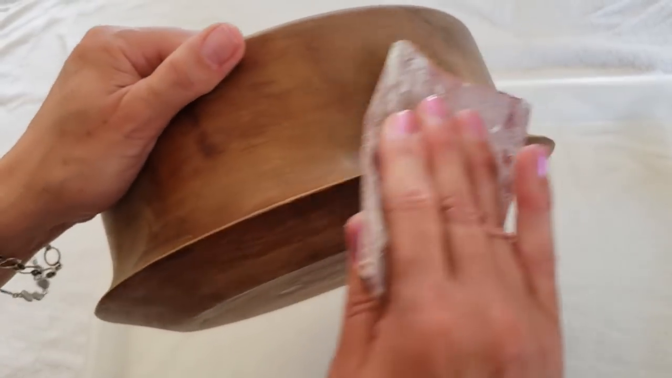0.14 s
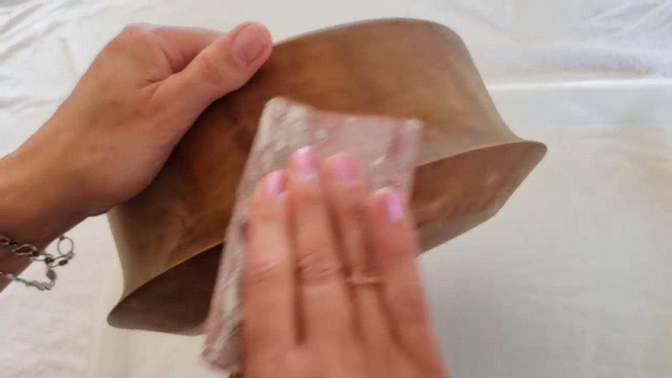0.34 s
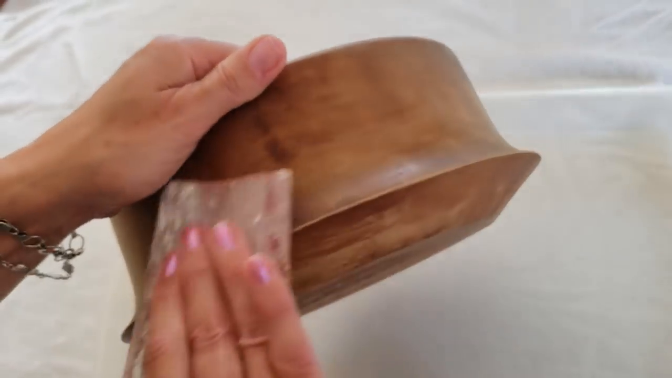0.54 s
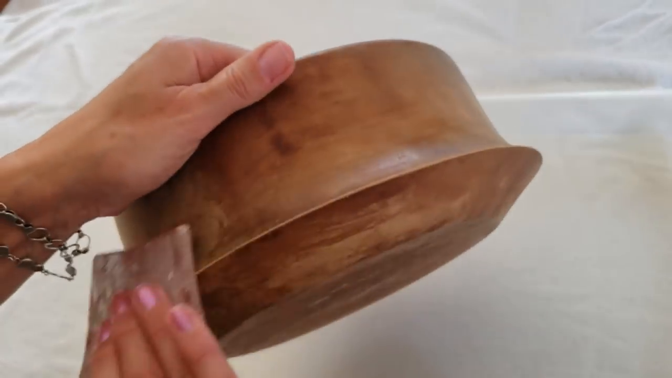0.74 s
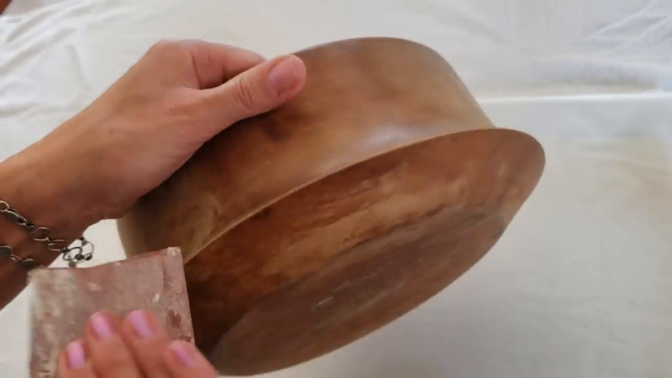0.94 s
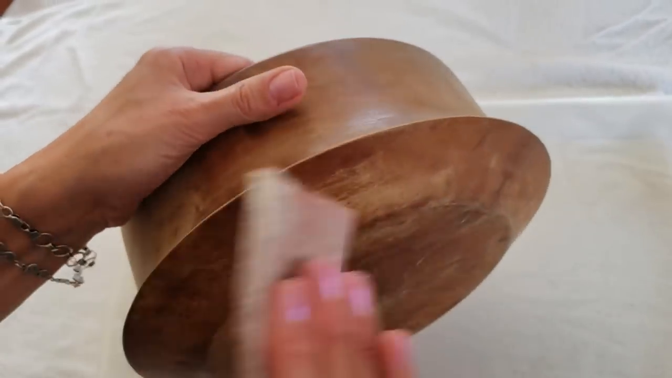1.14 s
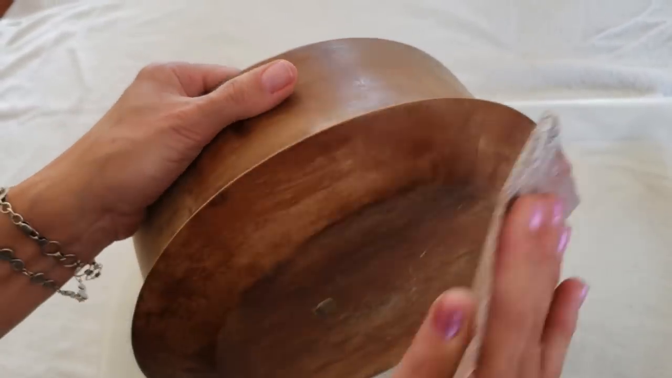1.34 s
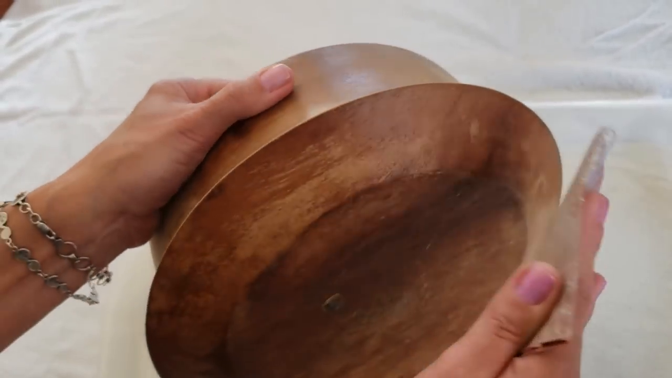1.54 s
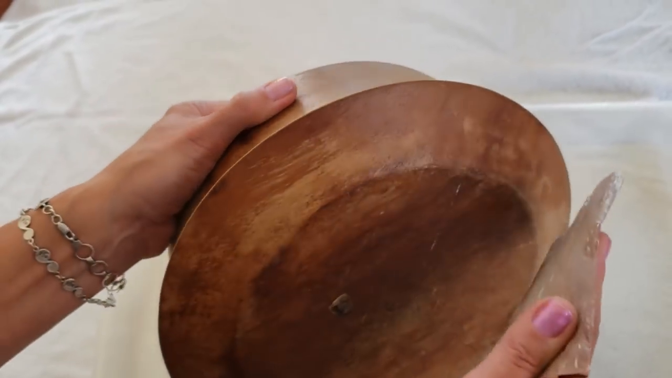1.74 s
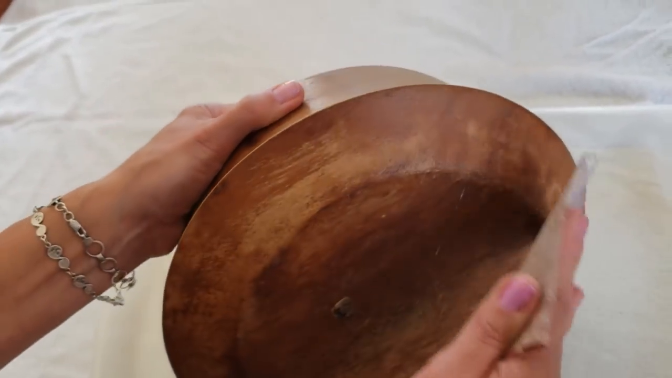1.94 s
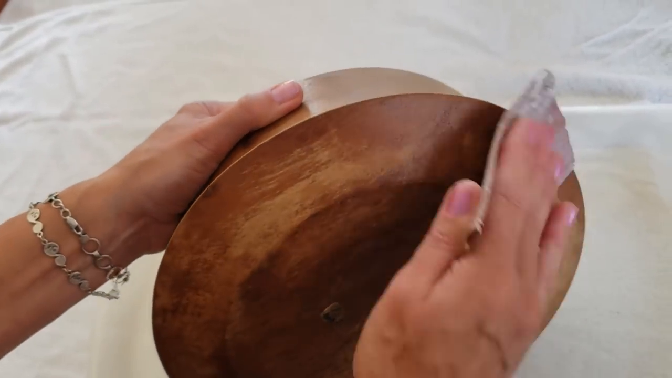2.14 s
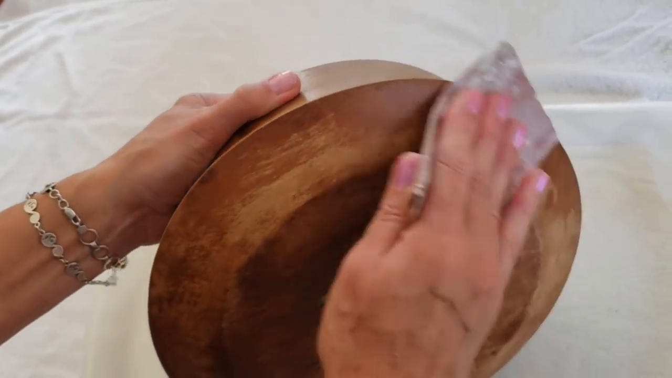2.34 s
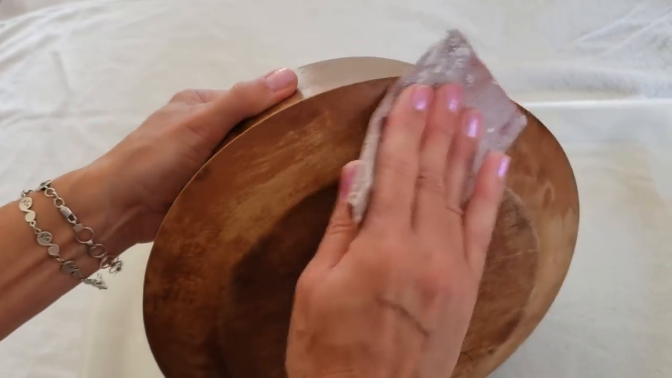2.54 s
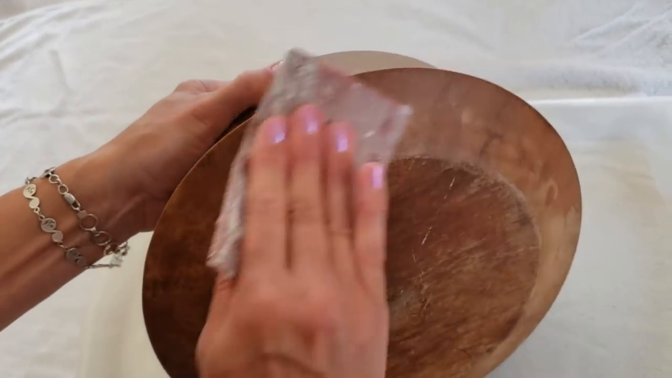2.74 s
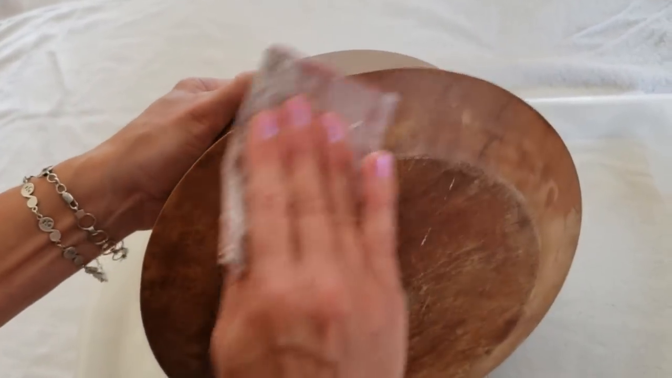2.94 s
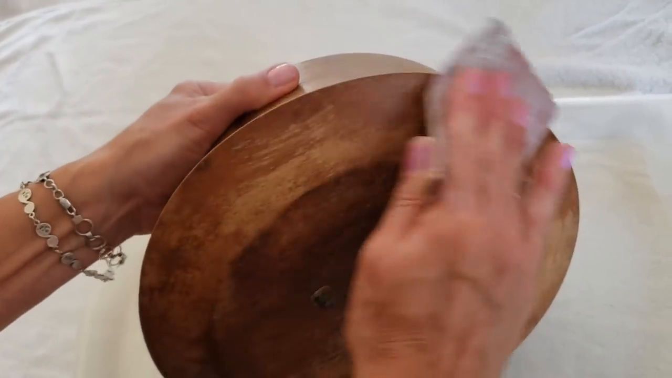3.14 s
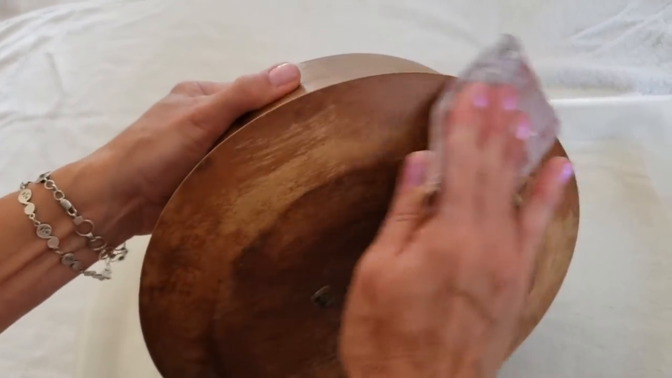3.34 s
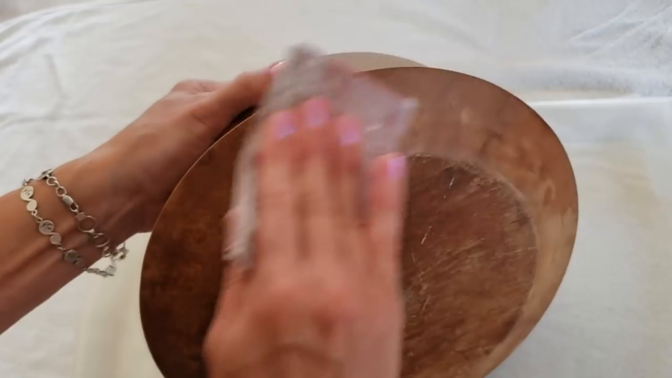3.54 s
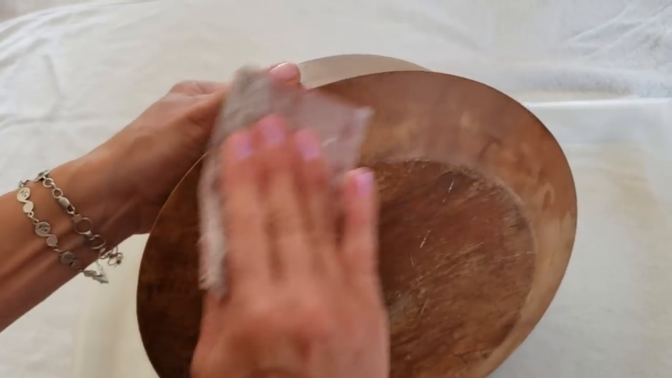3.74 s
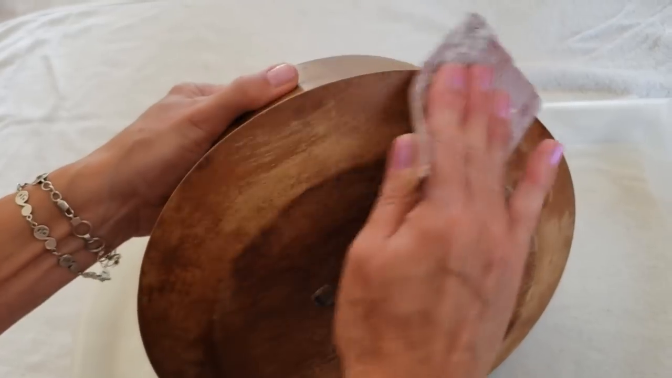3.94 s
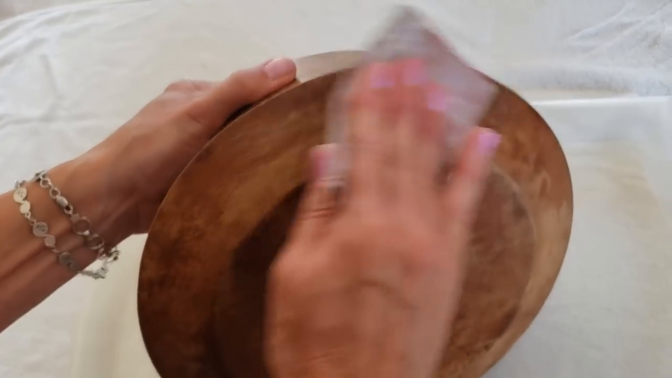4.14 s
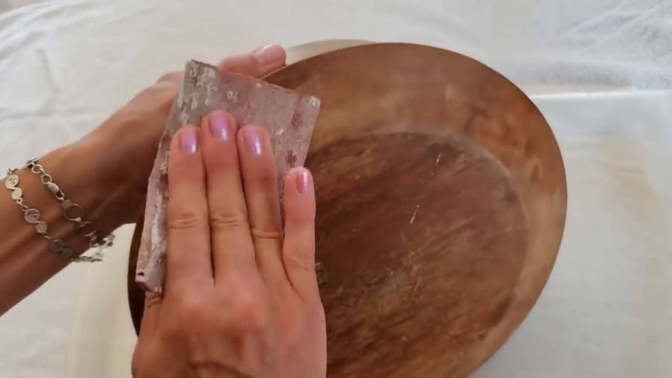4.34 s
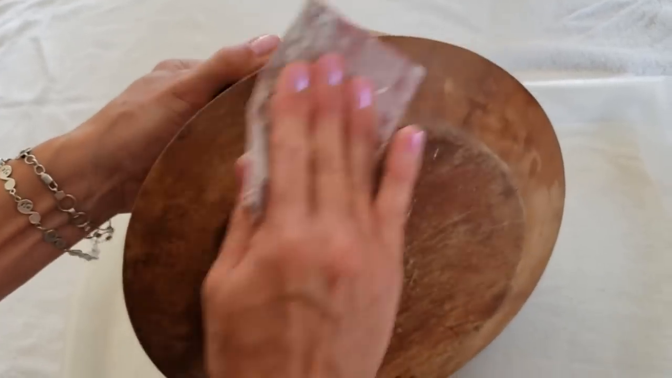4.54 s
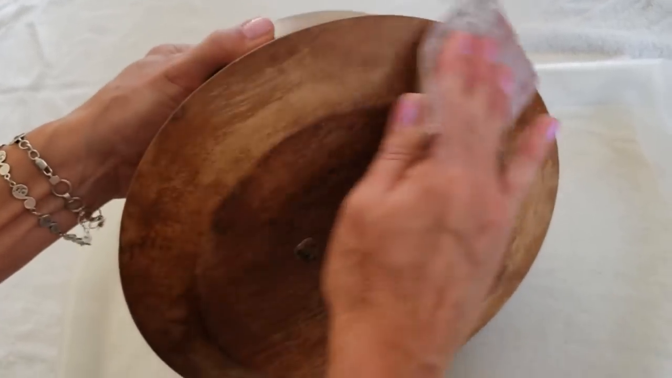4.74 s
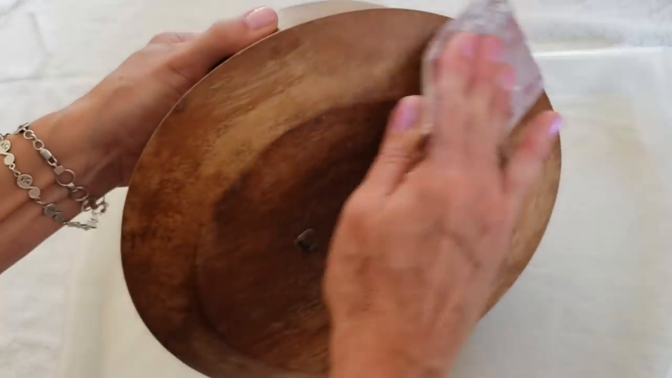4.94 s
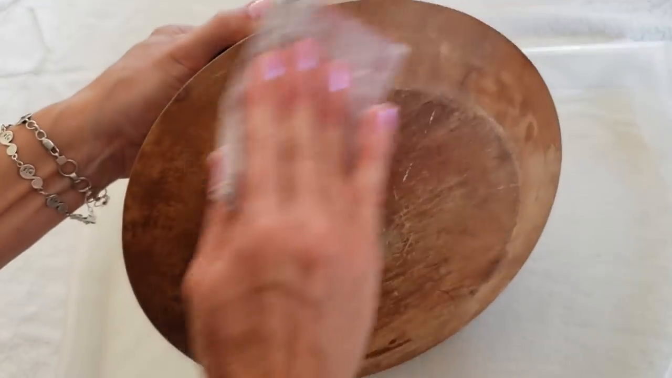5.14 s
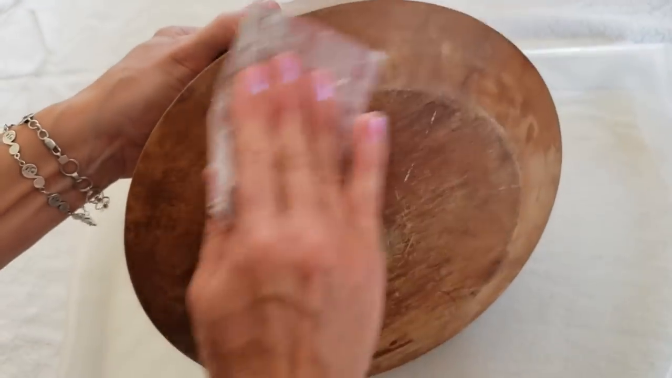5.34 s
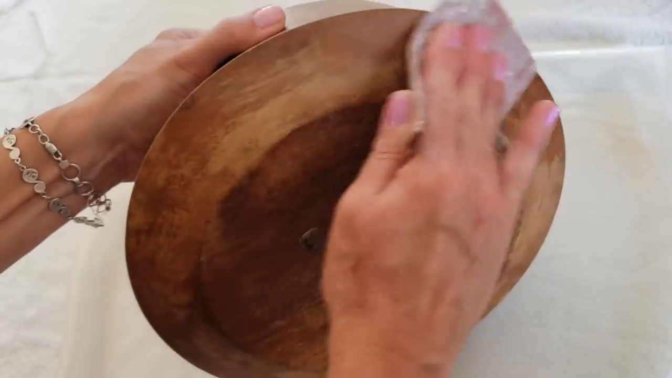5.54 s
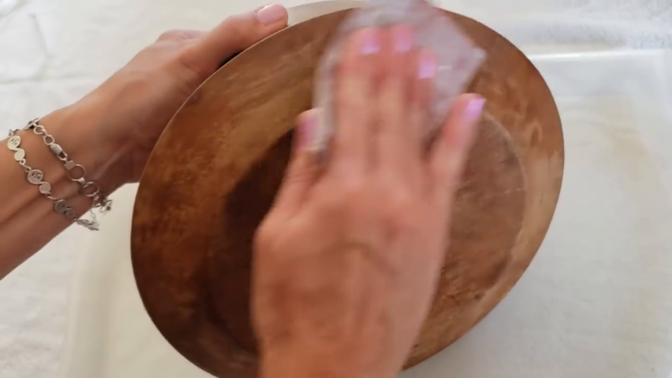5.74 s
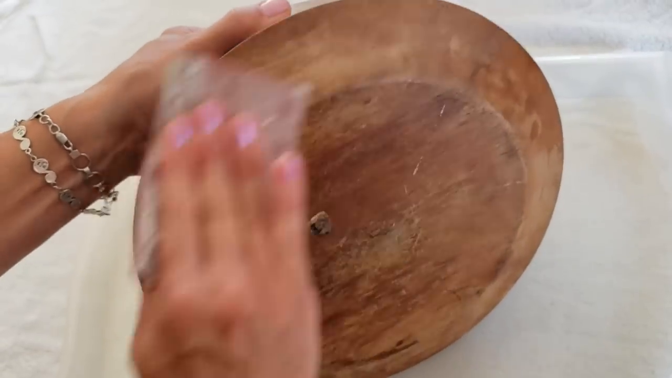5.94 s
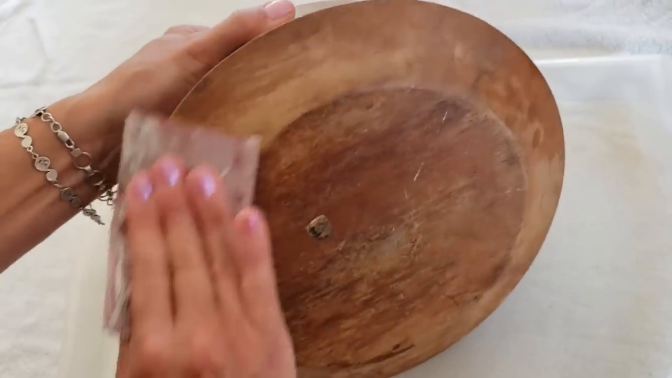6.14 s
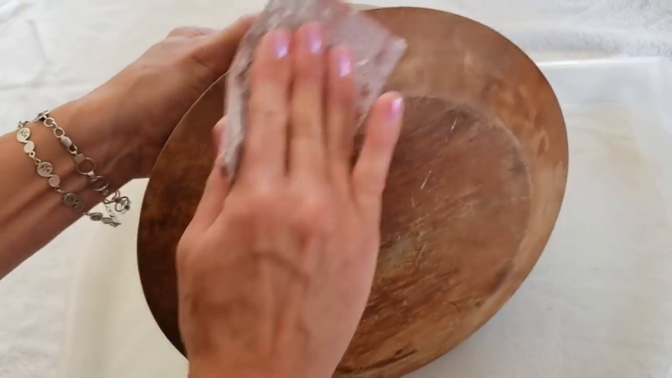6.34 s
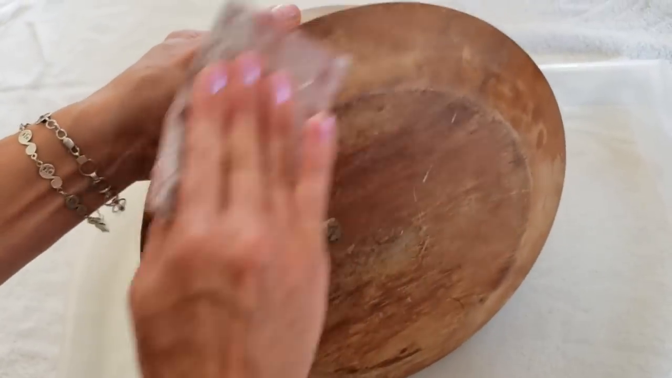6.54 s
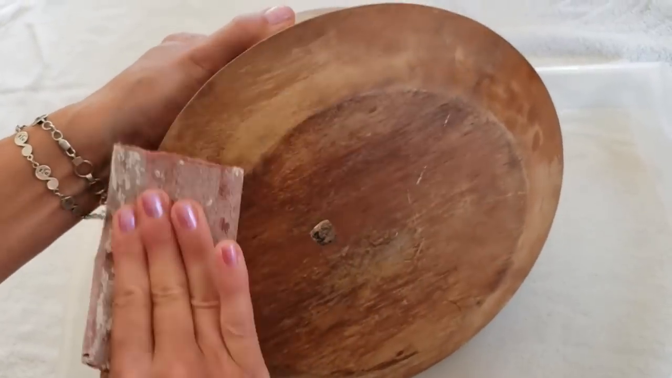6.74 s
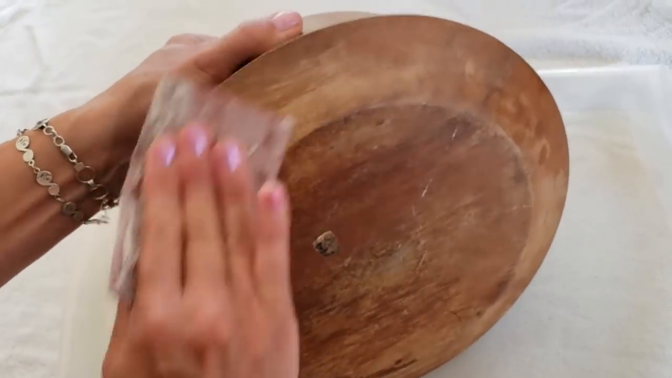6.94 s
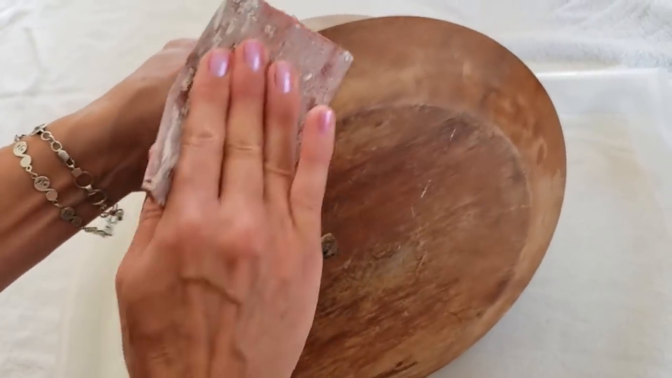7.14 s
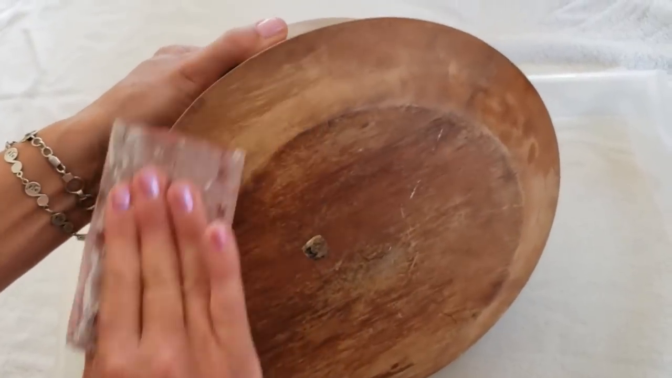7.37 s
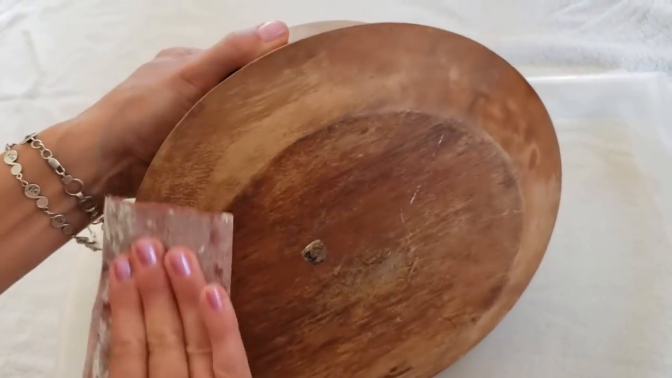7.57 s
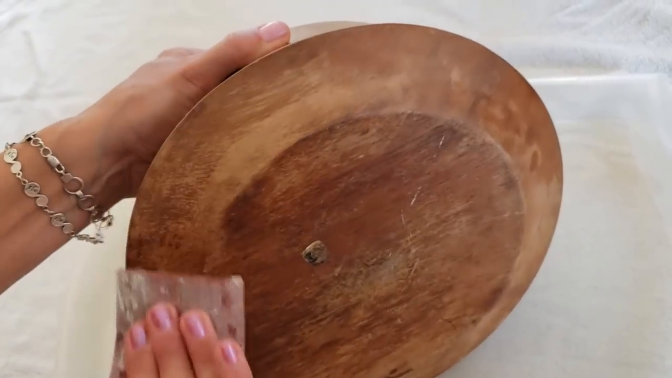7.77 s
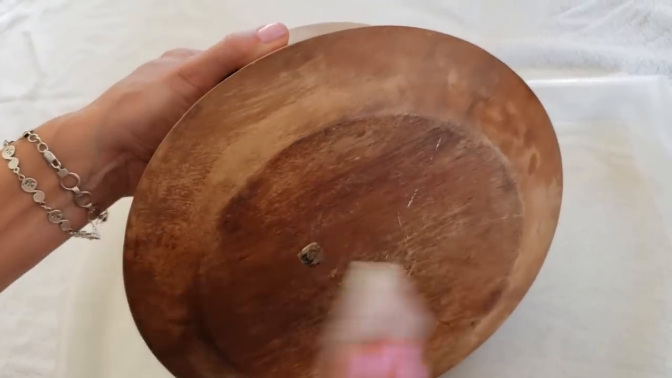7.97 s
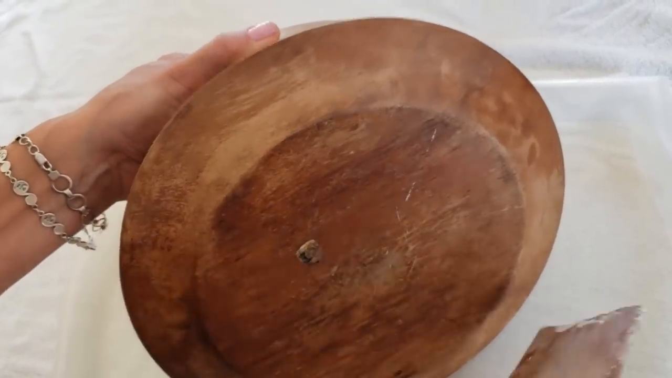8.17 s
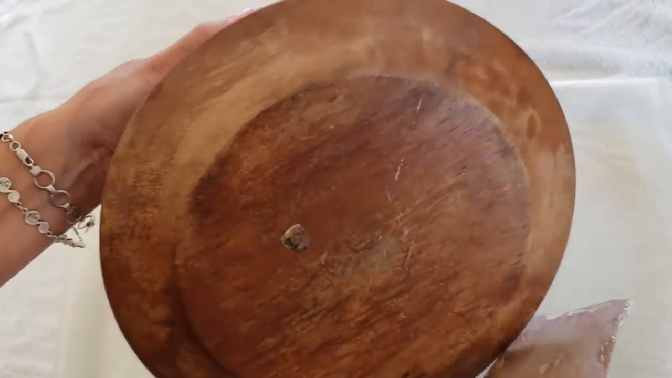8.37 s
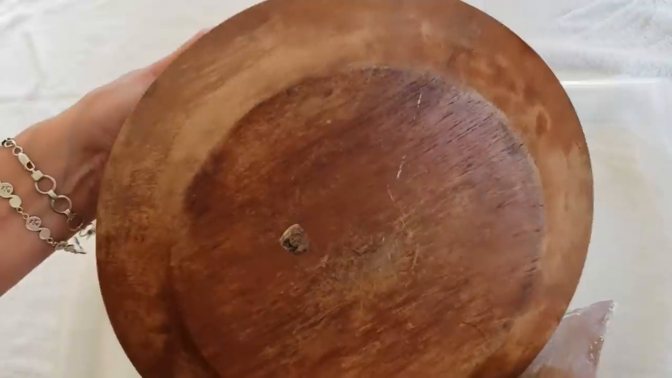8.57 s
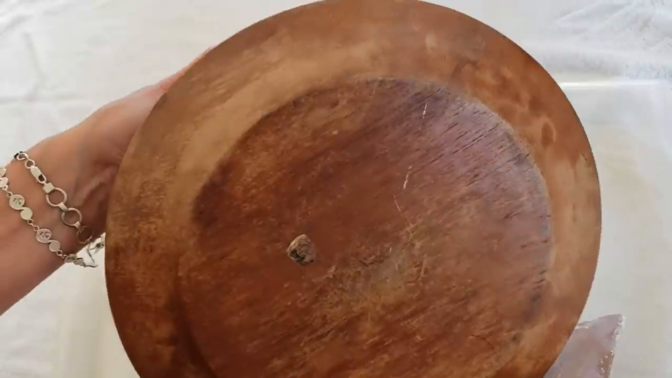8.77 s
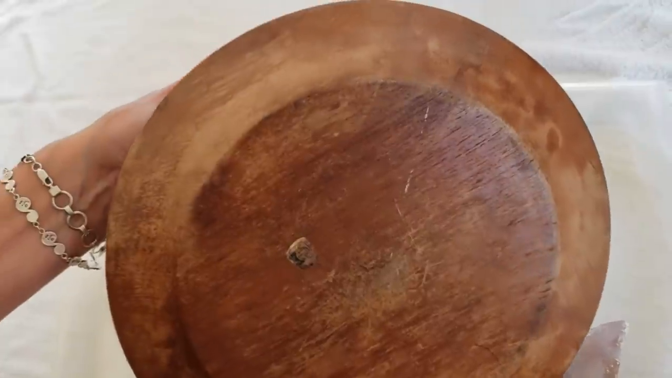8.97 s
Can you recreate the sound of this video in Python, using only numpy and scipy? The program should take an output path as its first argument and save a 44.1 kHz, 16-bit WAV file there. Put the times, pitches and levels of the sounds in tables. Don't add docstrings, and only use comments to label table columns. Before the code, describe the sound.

A quiet room with soft low hum, miked very close in stereo, left fuller, right brighter. From 0 to 0.9 s sandpaper lightly brushes a wooden bowl, which rings faintly; a sharp tick snaps far left at 0.55. Around 1.0 to 1.1 come soft scuffs and hollow finger taps, then near silence with handling rumble. At 1.8 the bowl knocks the table firmly, with a softer bounce at 1.92. Faint touches ring at 2.1. From 2.3 to 7.2 quick sanding strokes alternate, each about 0.3 to 0.4 s with two pushes, starting fast and stopping abruptly: dense dry grit, bright around 5 kHz, slightly woody. A crack lands at 5.68. A longer weaker stroke runs 7.2 to 7.9 and fades. After a pause, a tick and gentle ringing brush come at 8.4 to 8.65, then small ticks dwindle until 9 s.

```python
import sys
import numpy as np
from scipy import signal
from scipy.fft import rfft, irfft, next_fast_len
from scipy.io import wavfile
from scipy.ndimage import uniform_filter1d, map_coordinates

SR = 44100
rng = np.random.default_rng(int(sys.argv[2]) if len(sys.argv) > 2 else 0)


def elevation(decibels):
    levels = np.asarray(decibels, float)
    return 10 ** (levels / 20)


def transcribe(signal):
    frames = np.atleast_2d(signal).T
    limited = np.clip(frames, -1, 1)
    pcm = np.round(limited * 32767).astype(np.int16)
    wavfile.write(sys.argv[1], SR, pcm)


N = 397341
SIZE = next_fast_len(N + 16384)
HZ = np.maximum(np.arange(SIZE // 2 + 1) * SR / SIZE, 1)


def at_hz(points):
    hz, value = np.array(points).T
    return np.interp(np.log(HZ), np.log(hz), value)


def rms_one(x):
    return x / np.sqrt(np.mean(x ** 2) + 1e-20)


def drift(rate):
    r = np.exp(-80 * np.pi * rate / SR)
    noise = rng.standard_normal(N // 40 + 2002)
    slow = signal.lfilter([1], [1, -2 * r, r * r], noise)[2000:]
    return np.interp(np.arange(N) / 40, np.arange(len(slow)), rms_one(slow))


def causal(db):
    cepstrum = irfft(db * np.log(10) / 20, SIZE)
    cepstrum[1:SIZE // 2] *= 2
    cepstrum[SIZE // 2 + 1:] = 0
    return np.exp(rfft(cepstrum))


def bell(hz, width):
    return 1 / (1 + (2 * (HZ - hz) / width) ** 2)


# (f/Hz, left minus right level/dB)
PORTS = [(60, 7), (110, 10), (200, 11.5), (380, 14.5), (700, 3.5), (1290, 4.5), (2380, 9.5), (4400, 1.5),
         (8120, 1.5), (15000, -7)]
# (f/Hz, left-right correlation)
LIKENESS = [(60, .8), (400, 0.69), (1400, 0.47), (3000, .1), (15000, 0.0297)]


def ports(shared, own):
    alike = np.clip(at_hz(LIKENESS), 0, .99)
    tilt = elevation(at_hz(PORTS) / 2)
    mid = np.sqrt(1 + alike) * shared
    side = np.sqrt(1 - alike) * own
    return np.array([(mid + side) * tilt, (mid - side) / tilt])


def heard(pair, response):
    x = irfft(pair * response, SIZE)[:, :N]
    return x / np.sqrt(np.mean(x.mean(axis=0) ** 2) + 1e-20)


def port_noise():
    return ports(*rfft(rng.standard_normal((2, SIZE))))


# (f/Hz, level/dB per Hz)
HUM = [(15, -40), (25, -18), (45, -3.5), (86, -9), (113, -7), (179, -18.5), (216, -11.5), (255, -14.5),
       (352, -15.5), (620, -21.5), (1640, -33.5), (2200, -32.5), (8490, -43.5), (12700, -35.5),
       (15800, -37)]
# (f/Hz, width/Hz, level/dB)
HUM_TONES = [(206, 43, -78), (351.5, 27, -79.5), (450, 29, -91), (1614, 300, -82.5), (3730, 710, -87.5),
             (6000, 2900, -93.5)]
# (t/s, half width/s, rumble swell level/dB)
HANDLING = [
    (.7, 0.27, 5.5),
    (1.3, 0.063, 5.5),
    (1.98, .2, 6),
    (2.9, 0.67, -2),
    (4.2, 0.12, 2),
    (4.67, 0.11, -1),
    (7.7, 0.24, 6),
    (8.61, 0.11, 2),
]
HUM_DB, RUMBLE_DB, MURMUR_DB = -70, -75, -79.5
MURMUR_RUBBED_DB, RUBBED_FROM_DB = -71, -70


def hum(body):
    colour, t = elevation(at_hz(HUM)), np.arange(N) / SR
    out = elevation(HUM_DB - 11.5 + drift(3)) * heard(port_noise(), colour * (HZ > 750))
    pair = port_noise()
    for hz, width, db in HUM_TONES:
        out += elevation(db + 1.6 * drift(3)) * heard(pair, bell(hz, width))
    swell_db = sum(db * np.exp(-((t - s) / width) ** 2) for s, width, db in HANDLING)
    out += heard(pair, colour * (HZ <= 150)) * elevation(RUMBLE_DB + swell_db + 2.8 * drift(4.5))
    rubbed = uniform_filter1d(body / (body + elevation(RUBBED_FROM_DB)), size=9000)
    murmur = heard(port_noise(), colour * (HZ > 150) * (HZ <= 750))
    murmur_gain = elevation(MURMUR_DB + 0.87 * swell_db) + rubbed * elevation(MURMUR_RUBBED_DB)
    return out + murmur * murmur_gain * elevation(2.3 * drift(4.8))


ROOM_T60_S, ROOM_DB = .31, -10


def room(x):
    t = np.arange(14000) / SR
    tail = rng.standard_normal((2, len(t))) * elevation(-60 * t / ROOM_T60_S) * (t > .006)
    tail /= np.sqrt(np.sum(tail ** 2, axis=1, keepdims=True))
    dull = 1 / np.sqrt(1 + (HZ / 5000) ** 2)
    return elevation(ROOM_DB) * irfft(rfft(x, SIZE) * rfft(tail, SIZE) * dull, SIZE)[:, :N]


# (t/s, peak level/dB)
KNOCKS = [
    (1.005, -56),
    (1.803, -36.5),
    (1.924, -45.5),
]
# (f/Hz, level/dB, t60/s)
TABLE = [(91.6, 2.5, 2.7), (212, 1.5, 0.32), (273, -22, 0.56), (360, -8, 0.57), (605, -12, 0.49),
         (625, 4.5, 0.14), (810, -17, 0.36), (1060, -24, 0.47), (1223, -17, 0.21), (1486, -22, 5.0),
         (2083, -16, 0.27), (2360, -9, 0.19)]
# (f/Hz, level/dB, t60/s)
KNOCK_TAIL = [(81, 5, 0.4), (308, 1.5, 0.33), (680, 5.5, 0.22), (1430, 1, 0.1), (2420, -28, .07),
              (5000, -17, 0.27)]
KNOCK_CRACK_DB, KNOCK_CRACK_S = 3, .00018


def knocks():
    out, t = np.zeros((2, N)), np.arange(SR // 2) / SR
    lean_left = elevation([[3], [-3]])
    for s, db in KNOCKS:
        hit = np.zeros((2, len(t)))
        for hz, mode_db, t60 in TABLE:
            decay = elevation(mode_db - 18 + rng.normal(0, 0.67) - 60 * t / min(t60, .3))
            hit += decay * np.sin(2 * np.pi * hz * t) * lean_left
        for hz, tail_db, t60 in KNOCK_TAIL:
            sos = signal.butter(2, [hz / 1.6, hz * 1.6], "band", fs=SR, output="sos")
            noise = rms_one(signal.sosfilt(sos, rng.standard_normal((2, len(t)))))
            hit += elevation(tail_db - 19.0 - 60 * t / t60) * noise * lean_left
        crack = np.exp(-((t - .0012) / KNOCK_CRACK_S) ** 2)
        hit -= elevation(KNOCK_CRACK_DB) * crack * elevation([[-3], [-9]])
        i = round(s * SR)
        out[:, i:i + len(t)] += elevation(db) * hit * np.minimum(t / 0.00045, 1)
    return out


# (t/s, peak level/dB)
TAPS = [
    (.982, -52),
    (1.011, -48),
    (1.104, -56),
]
HOLLOW_HZ, HOLLOW_T60_S = 380, 0.07


def taps():
    out, t = np.zeros(N), np.arange(6000) / SR
    ring = np.sin(2 * np.pi * HOLLOW_HZ * t) * np.minimum(t / 0.0022, 1)
    for s, db in TAPS:
        i = round(s * SR)
        out[i:i + len(t)] += elevation(db - 60 * t / HOLLOW_T60_S) * ring
    return out * elevation([[4], [-8]])


# (t/s, peak level/dB, left minus right level/dB)
TICKS = [
    (0.5453, -27.5, 21.5),
    (2.2243, -49, 5),
    (5.6805, -31, 4.0),
    (8.4028, -45, 7.5),
    (8.6502, -47, 10),
    (8.7093, -49, 13),
    (8.763, -56, 12),
    (8.8544, -60, 16),
    (8.9644, -63, 11),
]
# (f/Hz, level/dB)
SNAP = [(500, -25), (1200, -6), (2500, 0), (5000, -3), (9000, -14), (15000, -20)]


def ticks():
    out, colour = np.zeros((2, N)), irfft(causal(at_hz(SNAP)), SIZE)[:300]
    for s, db, pan_db in TICKS:
        i = round(s * SR)
        burst = rng.standard_normal(40) * np.exp(-np.arange(40) / 6)
        crack = np.convolve(burst, colour)[:300]
        crack /= np.abs(crack).max()
        out[:, i:i + 300] += elevation(db + 1) * crack * elevation([[pan_db / 2], [-pan_db / 2]])
    return out


# (t/s, peak level/dB, length/s, bowl share level/dB)
SCUFFS = [
    (0.9675, -47.5, 0.0045, 5),
    (1.003, -35, 0.0052, 5),
    (1.091, -44.5, 0.011, -2),
    (7.925, -47.5, 0.0052, -4),
    (8.4, -47.5, 0.0079, 6),
    (8.649, -43.5, 0.0032, -1),
    (8.704, -48.5, 0.0076, -7),
]


def scuffs(layers):
    high, low = np.zeros(N), np.zeros(N)
    for s, db, length, bowl_db in SCUFFS:
        u = np.arange(1500) / SR / np.clip(length, .001, .011)
        shape = elevation(db - 16.5) * (u * np.exp(1 - u)) ** 2
        i = round(s * SR)
        high[i:i + 1500] += shape
        low[i:i + 1500] += shape * elevation(bowl_db)
    body, wall, grit, dust = layers
    return low * (0.81 * body + wall) + high * (grit + 0.4 * dust)


# (t/s, ring level/dB)
LIGHT = [
    [(0.0, -66), (0.132, -34), (0.198, -56), (0.282, -40), (0.39, -54), (0.444, -40.5), (0.6, -49),
     (0.76, -44), (0.97, -61)],
    [(1.97, -85), (2.02, -60), (2.088, -58.5), (2.104, -53.5), (2.16, -59.5), (2.2, -77)],
    [(8.425, -62), (8.437, -49.5), (8.47, -53), (8.5, -51.5), (8.55, -56), (8.609, -58.5), (8.623, -73),
     (8.645, -67)],
]
# (f/Hz, width/Hz, level/dB)
LAST_RINGS = [(1175, 60, 0), (1625, 45, 1), (2700, 250, -13), (3100, 200, -11), (4100, 300, -14),
              (5400, 600, -15)]
# (f/Hz, width/Hz, level/dB)
LIGHT_RINGS = [
    [(1150, 41, -7.5), (1824, 200, 2), (2600, 100, -4.5), (5810, 90, -12)],
    [(1258, 50, -6), (2240, 120, -0.5), (3360, 43, 3), (3980, 61, -3.5), (5380, 390, -2), (6600, 38, -18)],
    LAST_RINGS,
]
# plain grit between the rings, dust hiss re ring, trim (each level/dB)
LIGHT_BETWEEN_DB = (-20, -12.5, -4)
LIGHT_DUST_DB = (-4.5, -14, -9)
LIGHT_TRIM_DB = (-13, -2, -2)
LIGHT_SPREAD = (1.3, 2.4, 1.2)


def light_strokes(layers):
    t, out, pair = np.arange(N) / SR, 0, grit_clicks()
    body, wall, grit, dust = layers
    passages = zip(LIGHT, LIGHT_DUST_DB, LIGHT_RINGS, LIGHT_BETWEEN_DB, LIGHT_TRIM_DB, LIGHT_SPREAD)
    for rows, dust_db, rings, between_db, trim_db, spread in passages:
        s, db = np.transpose(rows)
        ring = sum(elevation(top_db) * bell(hz, spread * width) for hz, width, top_db in rings)
        plain = elevation(between_db) * (0.96 * body + wall + grit)
        ring_gain = elevation(np.interp(t, s, db + trim_db, left=-130, right=-130))
        dust_gain = elevation(np.interp(t, s, db + dust_db + trim_db, left=-130, right=-130))
        out = out + ring_gain * elevation(1.5 * drift(40)) * (heard(pair, ring) + plain)
        out = out + dust_gain * dust
    return out


CLICKS_PER_S, SIZE_SPREAD_DB, CLUMP_DB = 9000, 0.5, 1.6


def grit_clicks():
    sizes = elevation(SIZE_SPREAD_DB * np.minimum(rng.exponential(1, (2, N)), 4))
    sizes = sizes * rng.choice([-1, 1], (2, N))
    bites = rng.random((2, N)) < CLICKS_PER_S * elevation(CLUMP_DB * drift(60)) / SR
    return ports(*rfft(sizes * bites, SIZE))


# (f/Hz, level/dB per Hz)
GRIT = [(260, -39.5), (450, -23.5), (606, -23.5), (804, -12), (893, -11), (1170, -11), (1800, -15),
        (2460, -10.5), (3730, -10.5), (5330, 2.5), (6560, -12.5), (10100, -18.5), (13000, -16),
        (14400, -14.5), (15800, -26)]
# (f/Hz, width/Hz, lift level/dB)
BOWL = [(886, 200, -3), (1157, 60, 7.5), (1625, 37, 3.5), (1850, 120, -2), (2110, 51, 4), (2490, 170, 3),
        (3350, 61, 1), (5267, 1200, -8), (6560, 500, -1), (10270, 430, -5),
        (13050, 900, -8.5)]
LAYER_EDGES_HZ = (1900, 3500, 7000)


def grit_layers():
    pair = grit_clicks()
    lift_db = sum(db * bell(hz, width) for hz, width, db in BOWL)
    colour = causal(at_hz(GRIT) + lift_db)
    above = [1] + [1 / np.sqrt(1 + (hz / HZ) ** 16) for hz in LAYER_EDGES_HZ] + [0]
    bands = [np.sqrt(np.maximum(a ** 2 - b ** 2, 0)) for a, b in zip(above, above[1:])]
    return [heard(pair, colour * band) for band in bands]


# (start t/s, stop t/s, speed-up/s, slow-down/s)
STROKES = [(2.29, 2.584, 0.028, 0.0047), (2.545, 2.879, 0.012, 0.011), (2.935, 3.264, 0.0084, 0.0054),
           (3.321, 3.681, 0.014, 0.018), (3.751, 4.01, 0.011, 0.0043), (4.09, 4.396, 0.01, 0.007),
           (4.446, 4.857, 0.028, 0.012), (4.908, 5.269, 0.022, 0.012), (5.338, 5.612, 0.02, 0.007),
           (5.67, 6.098, 0.013, 0.01), (6.154, 6.424, 0.01, 0.004), (6.483, 6.805, 0.023, 0.011),
           (6.882, 7.153, 0.012, 0.0044), (7.208, 7.92, 0.024, 0.068)]
# (t/s, half width/s, grit level/dB, place: 0 = damped under the palm, 1 = free wall)
PUSHES = [(2.382, 0.039, -40, 0.78), (2.51, 0.036, -60.5, 0.3), (2.688, 0.12, -35.5, 0.71),
          (2.835, 0.025, -43.5, 0.18), (3.011, 0.051, -34, 0.2), (3.168, 0.069, -35, 0.57),
          (3.427, 0.08, -35, 1.4), (3.643, 0.17, -36, 0.32), (3.82, 0.068, -36, 0.14),
          (3.938, 0.054, -38.5, 0.51), (4.208, 0.084, -33.5, 0.68), (4.348, 0.019, -47, 0.42),
          (4.506, 0.082, -35.0, 0.19), (4.777, 0.1, -35.5, 0.65), (5.03, 0.11, -35.3, 1.12),
          (5.181, 0.052, -37, 0.25), (5.398, 0.1, -34, 0.12), (5.559, 0.039, -41, 0.75),
          (5.74, 0.12, -35.5, 0.99), (5.98, 0.063, -33, 0.38), (6.237, 0.045, -32, 0.27),
          (6.367, 0.031, -41.5, 0.14), (6.576, 0.14, -35.9, 0.44), (6.721, 0.058, -46.5, 0.99),
          (6.97, 0.065, -35, 0.28), (7.101, 0.034, -45, 0.38), (7.322, 0.078, -38, 0.29),
          (7.822, 0.2, -44, 0.27)]
# (level/dB at full effort, dB per unit of place, dB per dB of effort)
COLOUR = [(-14.5, 4, -0.59), (-9.5, 10.5, -0.44), (-1.78, 0.2, 0.18), (0.36, -4.5, 0.27)]
EDGE_BEND = (1.7, 2.3, 2.5, 3.1)
# (t/s, grit level/dB, place 0-1)
DRAGS = [
    [(0.0, -51.5, 0.35), (.15, -49.5, 0.16), (.53, -51.5, 0.16), (.58, -56, 0.37), (.64, -58.5, 0.4),
     (.75, -54.5, 0.63), (.85, -67, 0.8), (.95, -76, .3)],
    [(.95, -65.5, 0.4), (1.12, -73.5, .4), (1.15, -79.5, .4), (1.4, -93, 0.4)],
    [(2.2, -72.5, 0), (2.3, -73.5, 0.3)],
    [(7.88, -65, 0), (7.94, -72, 0), (8.05, -99, 0.1)],
    [(8.645, -80, 0.6), (8.8, -88, 0.36), (9.01, -86.5, 0.73)],
]
# (level/dB, dB per unit of place)
DRAG_COLOUR = [(-8.5, 18.5), (2, 1.5), (-0.6, -1.1), (-8.5, 10.5)]
FULL_EFFORT_DB = -36


def contact():
    t = np.arange(0, N, 50) / SR
    power = np.full((4, len(t)), 1e-13)
    for (start, stop, rise, fall), pushes in zip(STROKES, np.reshape(PUSHES, (-1, 2, 4, 1))):
        at, width, grit_db, push_place = pushes.transpose(1, 0, 2)
        press = elevation(grit_db) / (1 + ((t - at) / width) ** 2)
        effort = press.sum(axis=0)
        place = (press * push_place).sum(axis=0) / effort
        speed = 1 - np.exp(-np.maximum(t - start, 0) / rise)
        speed = speed * (1 - np.exp(-np.maximum(stop - t, 0) / fall))
        for row, (db, place_db, follows), bend in zip(power, COLOUR, EDGE_BEND):
            tone = (effort / elevation(FULL_EFFORT_DB)) ** follows * elevation(db + place_db * place)
            row += (effort * speed ** bend * tone) ** 2
    for rows in DRAGS:
        s, grit_db, place = np.transpose(rows)
        for row, (db, place_db) in zip(power, DRAG_COLOUR):
            row += elevation(np.interp(t, s, grit_db + db + place_db * place, left=-130, right=-130)) ** 2
    gains = np.sqrt(uniform_filter1d(power, size=4, axis=1))
    return np.array([np.interp(np.arange(N) / SR, t, row) for row in gains])


LAYER_TRIM_DB = (0.13, 0.038, 0.046, 0.086)
PATCHY_DB = .6


def sanding(layers, gains):
    together, out = drift(25), 0
    for x, gain, trim_db in zip(layers, gains, LAYER_TRIM_DB):
        out = out + x * gain * elevation(trim_db + PATCHY_DB * (0.27 * together + drift(6.3)))
    return out


HAND_ECHO, HAND_LAG_S, HAND_SWAY_S = 0.28, 0.000602, 0.00011


def hand_echo(x):
    lags = [np.maximum(HAND_LAG_S + HAND_SWAY_S * drift(2.27), 0) * SR for side in x]
    times = np.array([np.arange(N) - lag for lag in lags])
    sides = np.repeat([[0], [1]], N, axis=1)
    late = map_coordinates(x, [sides, times], order=3)
    return (x + HAND_ECHO * late) / np.sqrt(1 + HAND_ECHO ** 2)


def scene():
    layers, gains = grit_layers(), contact()
    near = hand_echo(sanding(layers, gains)) + light_strokes(layers)
    near = near + scuffs(layers) + ticks() + knocks() + taps()
    return near + room(near) + hum(gains[0])


# (f/Hz, level/dB)
STARVED = [(40, -55), (150, -57), (350, -50), (600, -45), (950, -40), (1900, -41), (2600, -70)]
TOP_HZ = 15770


def starve(x):
    hz, _, z = signal.stft(x, SR, nperseg=2048, noverlap=1536)
    band = uniform_filter1d(uniform_filter1d(np.abs(z) ** 2, size=3, axis=1), size=2, axis=2)
    treble = np.sum(np.abs(z[:, hz > 2000]) ** 2, axis=(0, 1))
    limit_db = np.interp(hz, *np.transpose(STARVED))[:, None]
    over_db = 10 * np.log10(band / (treble + 1e-20) + 1e-20) - limit_db
    uneven_db = uniform_filter1d(rng.normal(0, 16, z.shape), size=4, axis=1)
    uneven_db = uniform_filter1d(uneven_db, size=7, axis=2)
    under_top = hz[:, None] < TOP_HZ
    keep = np.clip((over_db + uneven_db) / 2 + .5, 0, 1) * under_top
    kept = z * np.where(hz[:, None] < 2600, keep, under_top)
    return signal.istft(kept, SR, nperseg=2048, noverlap=1536)[1][:, :N]


AIR_DB, AIR_FROM_HZ = -77, 13000


def band_limit(x):
    return signal.sosfilt(signal.butter(12, 16280, fs=SR, output="sos"), x)


def record(dry):
    hiss_band = signal.butter(4, AIR_FROM_HZ, "high", fs=SR, output="sos")
    air = signal.sosfilt(hiss_band, rng.standard_normal((2, N)))
    low_cut = signal.butter(4, 44, "high", fs=SR, output="sos")
    mix = starve(signal.sosfilt(low_cut, dry + elevation(AIR_DB) * air))
    return band_limit(mix)


dry = scene()
out = record(dry)
transcribe(out)
```